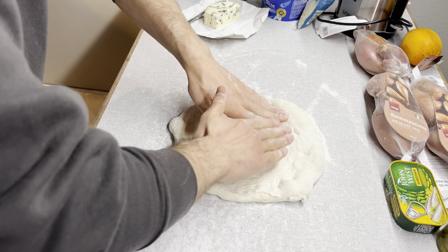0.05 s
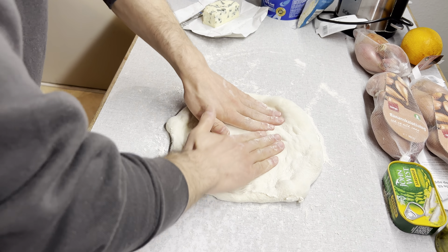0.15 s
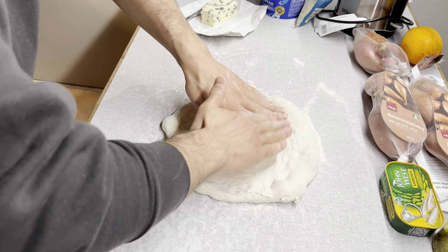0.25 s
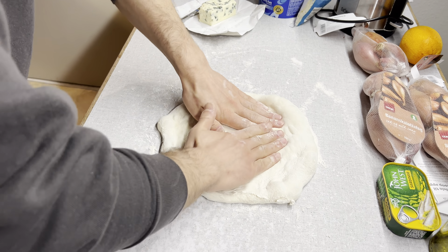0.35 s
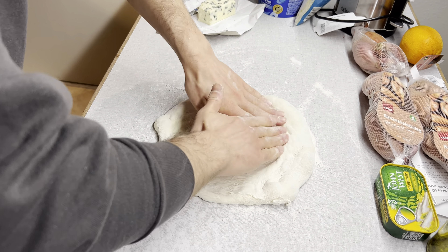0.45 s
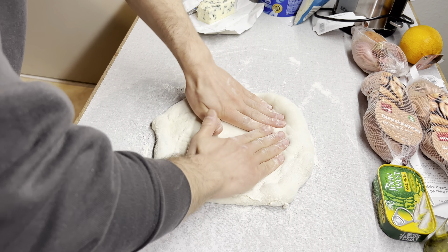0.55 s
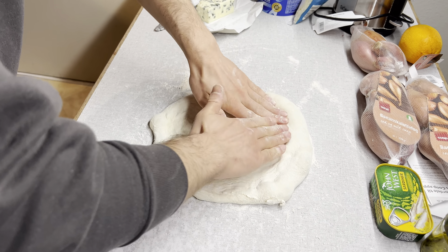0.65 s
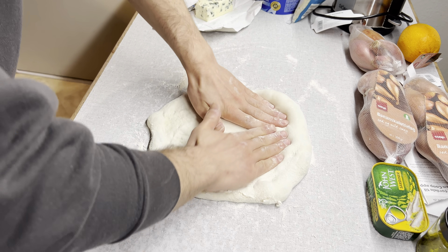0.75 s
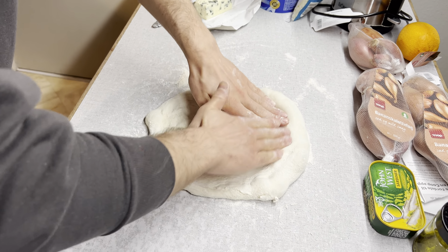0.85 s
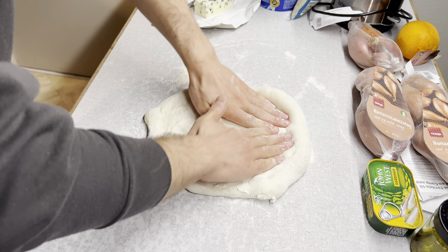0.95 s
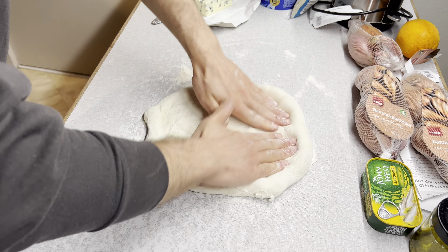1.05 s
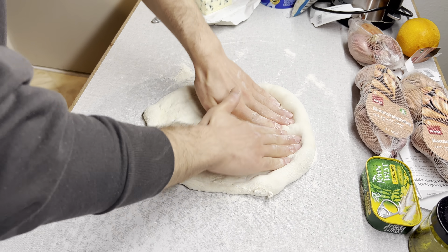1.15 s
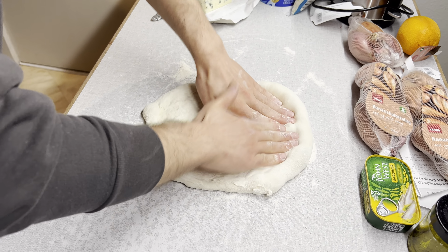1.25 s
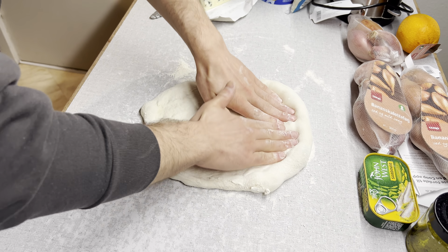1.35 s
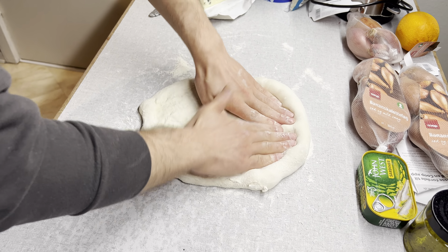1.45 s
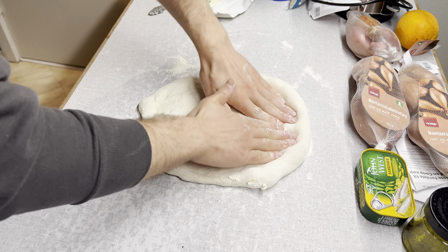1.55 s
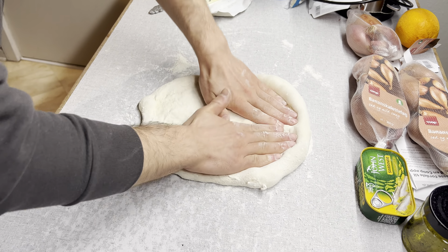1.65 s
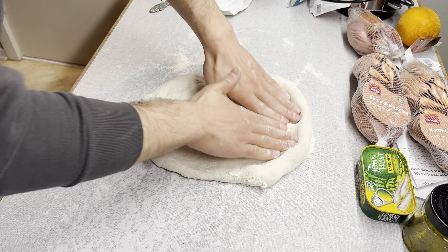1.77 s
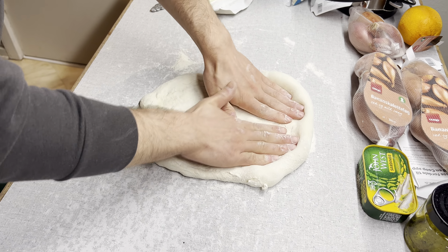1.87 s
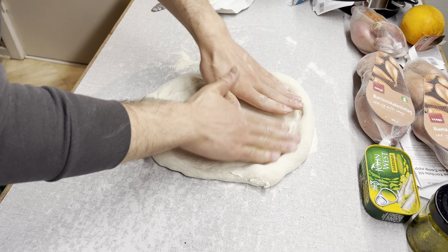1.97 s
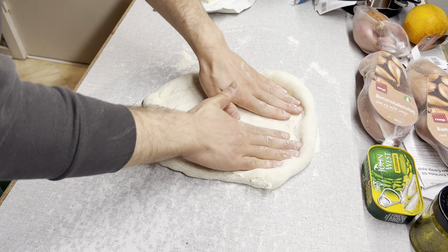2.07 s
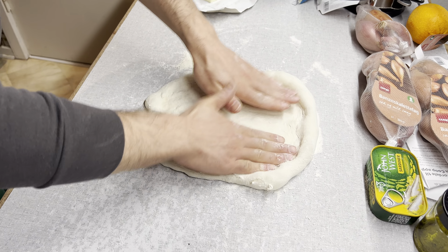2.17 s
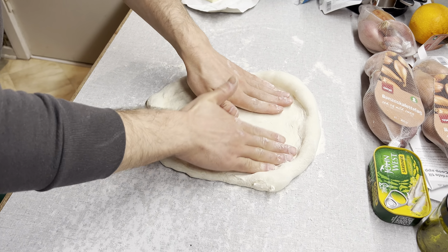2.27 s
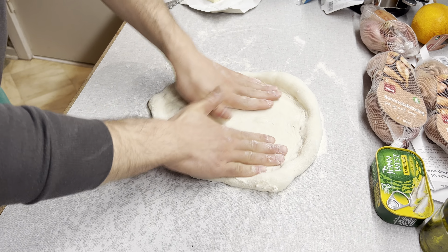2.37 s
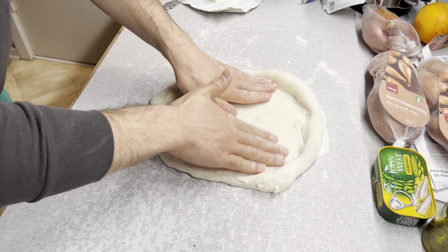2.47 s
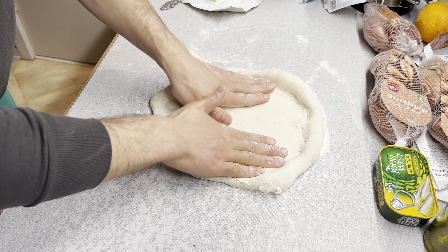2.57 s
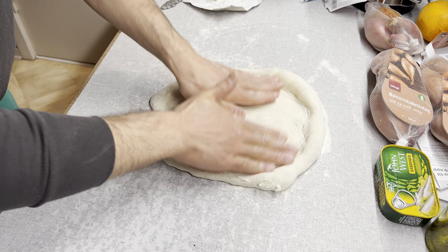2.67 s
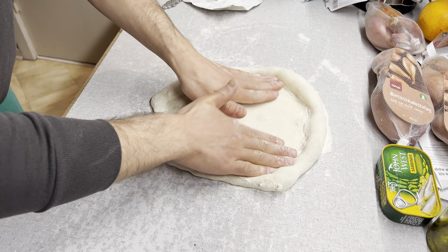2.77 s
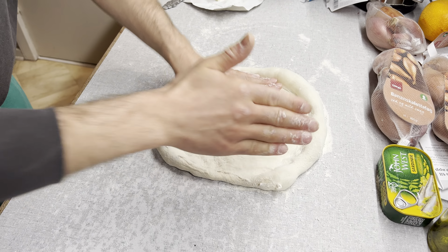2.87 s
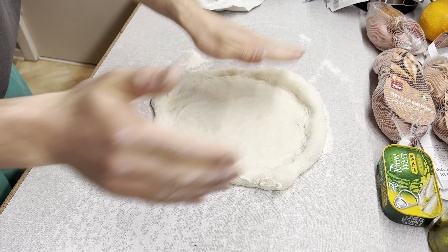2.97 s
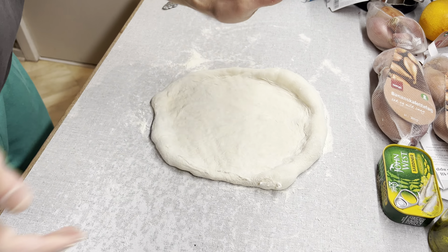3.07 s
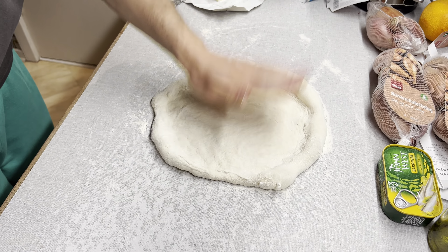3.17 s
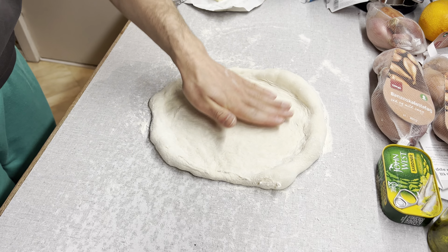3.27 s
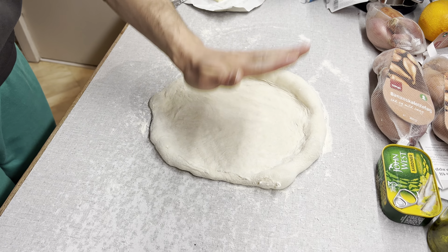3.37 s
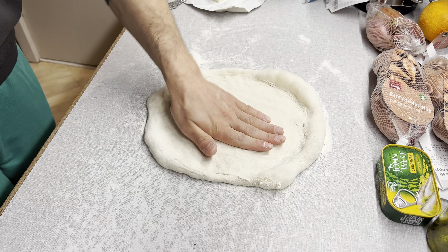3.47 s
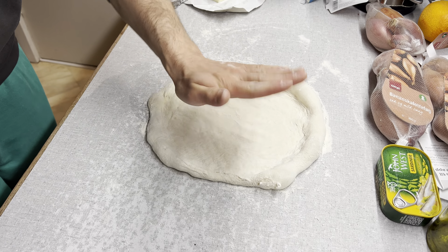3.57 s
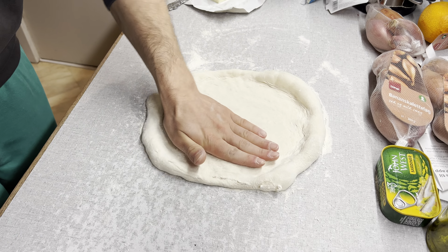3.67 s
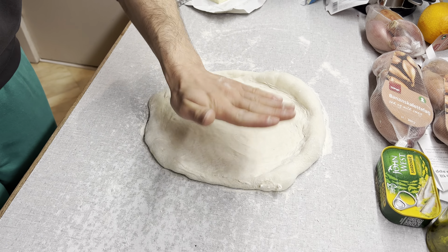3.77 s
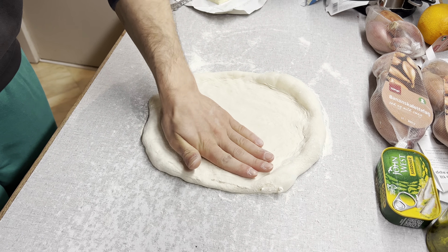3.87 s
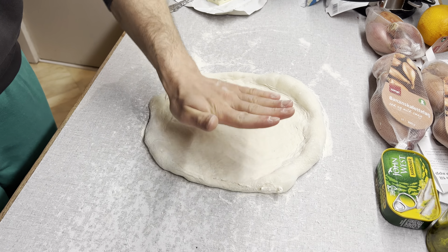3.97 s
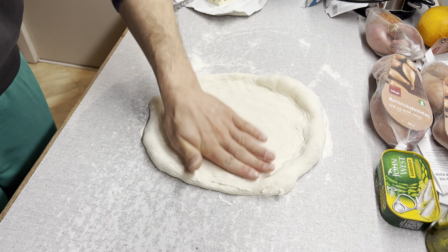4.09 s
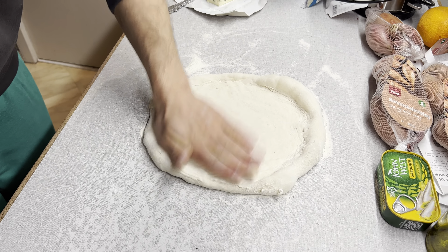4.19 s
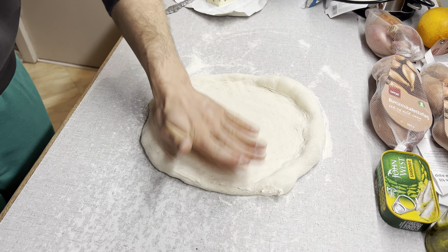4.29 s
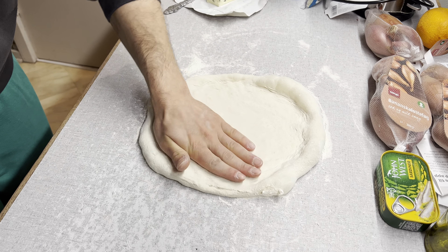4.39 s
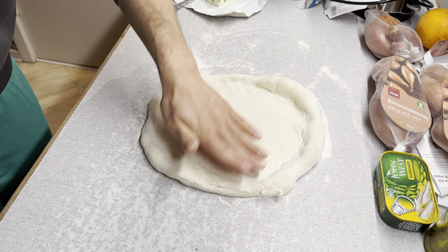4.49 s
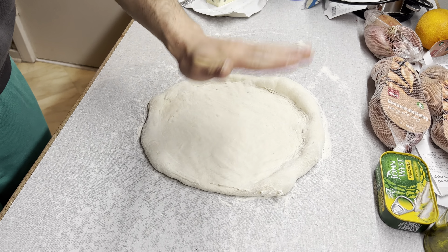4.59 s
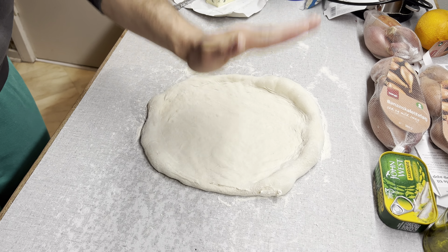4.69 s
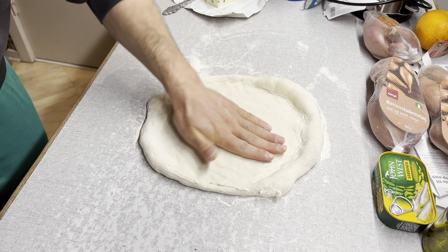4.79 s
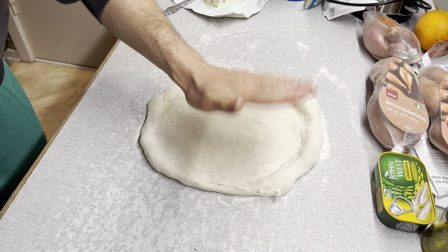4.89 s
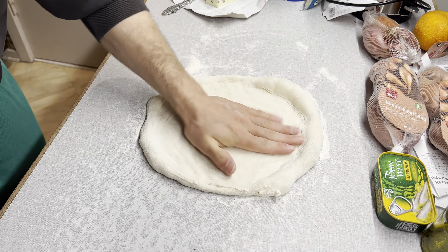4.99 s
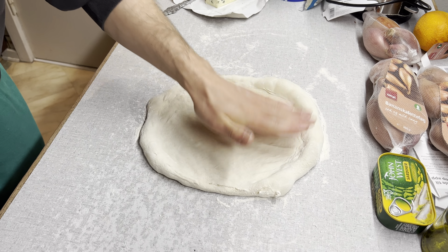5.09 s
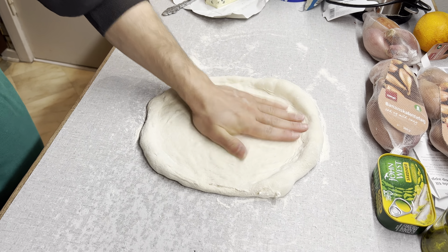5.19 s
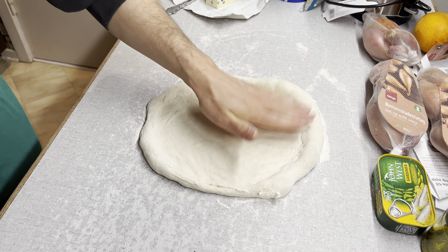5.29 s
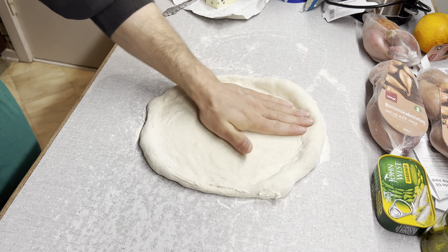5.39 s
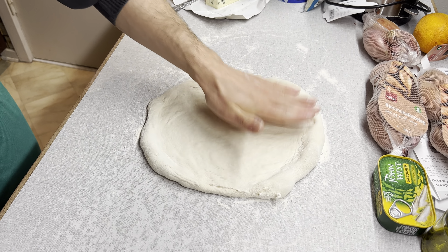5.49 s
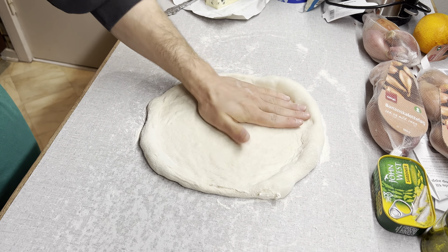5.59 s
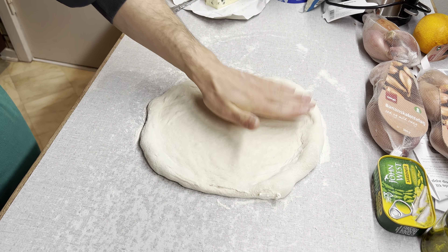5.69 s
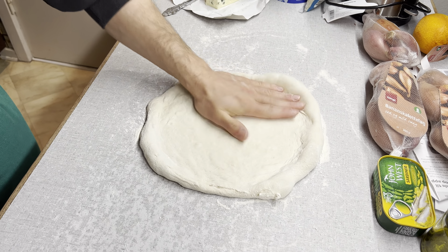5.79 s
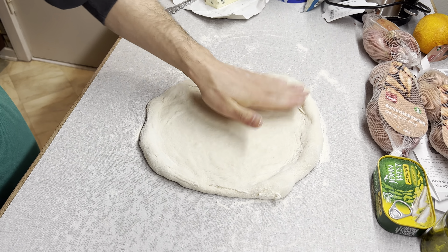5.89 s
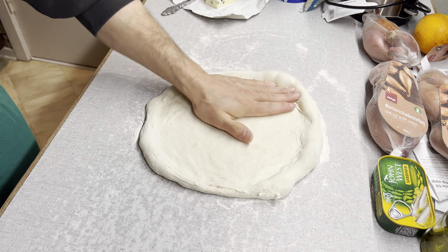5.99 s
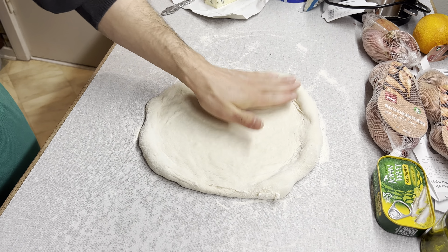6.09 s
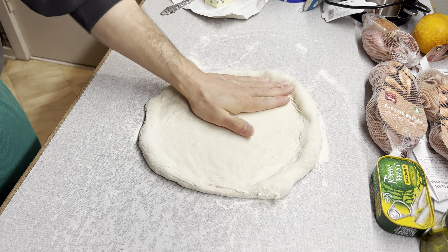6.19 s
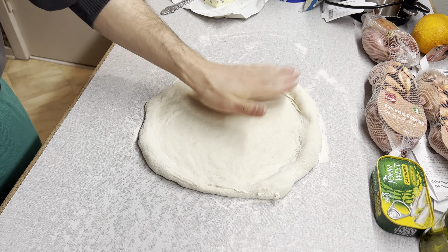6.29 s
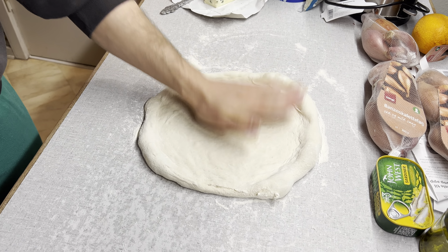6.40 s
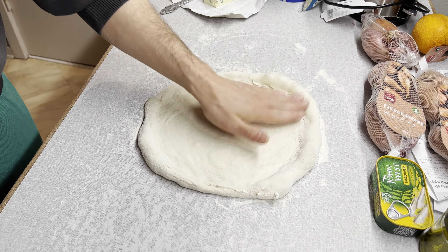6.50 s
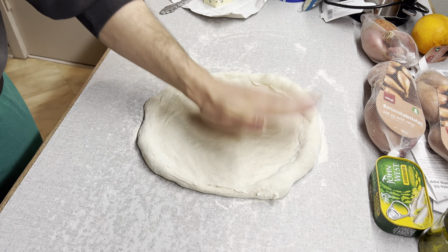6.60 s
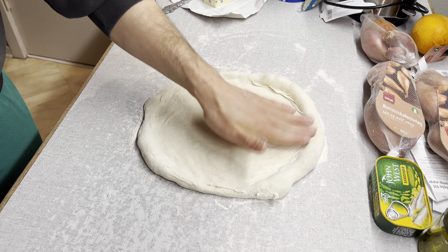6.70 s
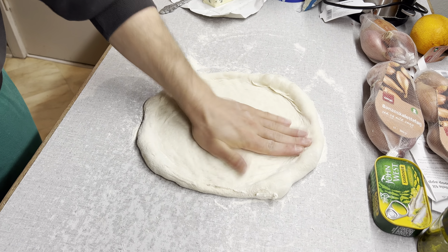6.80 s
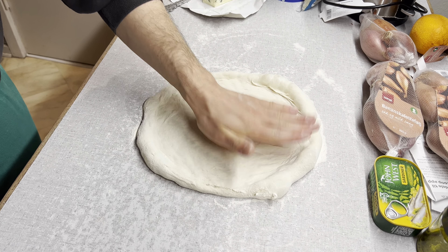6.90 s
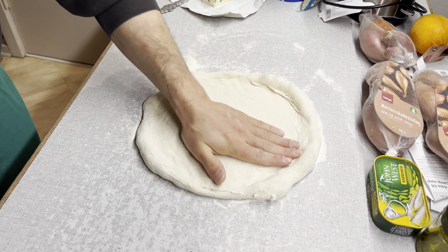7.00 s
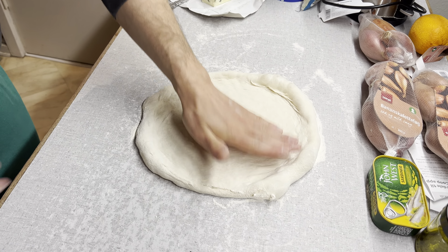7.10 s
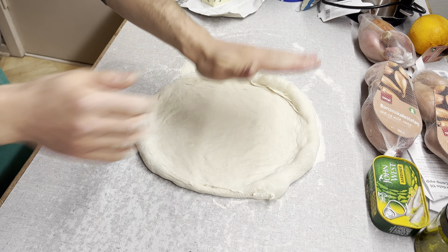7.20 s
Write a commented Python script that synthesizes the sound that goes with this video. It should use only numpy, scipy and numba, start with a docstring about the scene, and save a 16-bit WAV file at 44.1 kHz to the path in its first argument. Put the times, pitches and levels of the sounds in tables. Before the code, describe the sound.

Soft dull pats on dough over a steady appliance whir, then loud open-hand slaps in quick runs on a hard kitchen worktop.

```python
"""In a small, hard kitchen, two floury hands press and pat a round of dough on a worktop.
Then one open hand slaps it flat in two quick runs, while an appliance whirs steadily.
Each blow is shaped noise (air, skin and damp dough) plus ringing tones (worktop and cupboard).
The room answers with a wash of noise; the phone's gain control turns down once the loud slaps begin."""
import sys
import numpy as np
from scipy import signal
from scipy.fft import rfft, irfft, next_fast_len
from scipy.io import wavfile
from scipy.ndimage import uniform_filter1d
from numba import njit

SR = 44100
rng = np.random.default_rng(int(sys.argv[2]) if len(sys.argv) > 2 else 0)


def file_out(sig):
    """Save sig as 16-bit WAV at sys.argv[1]."""
    # one column per channel
    cols = np.atleast_2d(sig).T
    # limit, then scale
    lim = np.clip(cols, -1, 1)
    pcm = np.round(lim * 32767).astype(np.int16)
    wavfile.write(sys.argv[1], SR, pcm)


N = 319725  # length of the scene in samples

# All levels below are relative, before the phone changes them.
# The appliance's rush of air: (frequency [Hz], density [dB per Hz])
WHIR_SPECTRUM = [(18, -49), (30, -5), (48, -9), (102, -5.5), (171, -2.5), (337, -3), (472, -9), (552, -6.5),
                 (978, -11.5), (1340, -14), (1830, -17), (6360, -25), (10700, -31.5), (11900, -37.5),
                 (15000, -41)]
# The appliance's hum: (frequency [Hz], width [Hz], level [dB])
HUM_BANDS = [(94.7, 8.4, -43.5), (650, 50, -54.5), (1035, 60, -58), (1394, 35, -51.5), (1700, 43, -52.5)]
# Kitchen reverberation: (frequency [Hz], time to fade by 60 dB [s], level against the direct sound [dB])
KITCHEN_ECHO = [(59.6, 0.11, 1), (147, 0.43, -12), (380, 0.42, -2), (815, 0.45, 0.5), (1385, 0.35, -1.5),
                (2200, 0.35, -8.5), (6600, 0.43, -7.5), (14200, 0.25, -20)]
# Worktop, cupboard and the air around them: (frequency [Hz], level [dB], time to fade by 60 dB [s])
WORKTOP_MODES = [(57.6, -2, 0.23), (76.7, 7.5, 0.04), (107, -36, 0.039), (133.26, 4, 0.27),
                 (134.17, 11, 0.16), (201.2, 5, 0.13), (238, -4, 0.2), (256.4, 1.5, 0.15),
                 (317.8, 7, 0.059), (321, -8, 0.24), (358.3, -11, 0.47), (436.4, -6, 0.13)]
# Soft pats with the hands kept on the dough: (time [s], weight [dB], skin tick [dB])
PAT_EVENTS = [(0.1013, -32, -38.5), (0.315, -33.5, -43), (0.3761, -38.5, -46), (0.6993, -38, -46),
              (.893, -37, -48), (1.066, -35.5, -42.5), (1.2614, -36, -43.5), (1.459, -35.5, -36),
              (1.646, -34.5, -49), (2.0093, -30, -32), (2.202, -31, -36.5), (2.368, -28, -32),
              (2.5315, -35.5, -44), (2.6961, -28.5, -41.5)]
# A soft touch of floury skin: (frequency [Hz], density [dB per Hz])
TICK_SPECTRUM = [(500, -1.5), (1500, 2.5), (3000, -7.5), (5500, -0.5), (9000, -11), (13000, -14),
                 (16000, -29)]
# Open-hand slaps: (time [s], weight [dB], crack [dB], air pocket [Hz], time the hand takes to close [ms])
SLAP_EVENTS = [(3.2068, -13.5, -11.5, 3400, 1.3), (3.4309, -4, -4, 3020, 2.2),
               (3.6412, -5, -1.5, 2500, 0.63), (3.8405, -11.5, -5.5, 2090, 8.6),
               (4.0263, -6.5, -5.5, 5600, 2), (4.2124, -6, -9, 3600, 5.6), (4.3614, -6, -10.5, 1880, 1),
               (4.7634, -10, -9.5, 1760, 1.9), (4.992, -3.5, -3, 2200, 2.5),
               (5.2036, -5.5, -10.5, 2870, 0.92), (5.3863, -10.5, -13, 3190, 4.9),
               (5.5887, -13.5, -9.5, 3800, 3.8), (5.7952, -9.5, -7.5, 1690, 2.6),
               (5.984, -8, -8, 2200, 2.9), (6.1746, -11, -12, 3100, 2.4), (6.4328, -5.5, -6.5, 3250, 1.7),
               (6.6362, -23, -18.5, 4340, 3.8), (6.812, -16.5, -17, 4170, 5.7),
               (7.0001, -8.5, -6, 3920, 4.8)]
# The palm closing on dough, before the dough dampens it: (frequency [Hz], density [dB per Hz])
SMACK_SPECTRUM = [(150, -36), (380, -12), (650, -1), (900, -7), (1500, -8.5), (2300, -10), (4000, -21)]
# Skin meeting dough, before any treble or pocket lift: (frequency [Hz], density [dB per Hz])
CRACK_SPECTRUM = [(500, -4), (1300, -4.5), (2200, 7.5), (3200, -3), (4500, -0.5), (6500, -4.5),
                  (8800, -11.5), (12500, -21), (14500, -17), (16000, -37)]
# Microphone colour: (frequency [Hz], gain [dB])
MICROPHONE_COLOUR = [(7000, 0), (7700, -6), (8400, 0), (9600, -2), (10800, -14), (12000, 0), (14500, -1),
                     (16000, -9)]
# Extra shade on the right port: (frequency [Hz], gain [dB])
RIGHT_PORT_COLOUR = [(150, 0), (330, 2), (700, -1), (2400, .5), (3500, -2), (5200, -10), (8200, -6),
                     (12500, 0)]

TOP_HZ = 15900  # the phone keeps nothing much above this
RING = np.arange(int(.6 * SR)) / SR  # time axis of one ringing sound [s]
# A heavier blow squashes the dough sooner: push length at 0 dB, and the extra weight that halves it
SLAP_PUSH_MS, PAT_PUSH_MS, PUSH_HALVING_DB = 0.85, .75, 12.5
# The damp smack grows with the weight: level at 0 dB, and dB per dB of weight
SLAP_SMACK_DB, SLAP_SMACK_GROWTH = -6.5, 0.93
PAT_SMACK_DB, PAT_SMACK_GROWTH = -7, 1.235
# A hand that closes faster cracks brighter and seals its air pocket better:
# lift at 1 ms, and loss per doubling of the closing time
TREBLE_DB, TREBLE_LOSS_DB = 9, 0.66
POCKET_DB, POCKET_LOSS_DB = 11.5, 1.5


def undb(db):
    """Turn decibels into a plain factor."""
    return 10 ** (np.asarray(db) / 20)


def unit(x, seconds):
    """Scale x so that its energy, spread over the given time, has rms 1."""
    energy = np.sum(x ** 2, axis=-1, keepdims=True)
    return x / np.sqrt(energy / (seconds * SR))


def read(points, hz, axis=1):
    """Read one column of a table at the given frequencies, on a log axis."""
    points = np.array(points, float)
    return np.interp(np.log(np.maximum(hz, 1)), np.log(points[:, 0]), points[:, axis])


def colour(x, points):
    """Filter x with a spectrum of (frequency [Hz], level [dB]) points."""
    size = next_fast_len(x.shape[-1] + 2048)
    gain = undb(read(points, np.fft.rfftfreq(size, 1 / SR)))
    return irfft(rfft(x, size) * gain, size)[..., :x.shape[-1]]


def resonance(x, hz, width_hz):
    """Let through a narrow band, with gain 1 at its centre (two poles)."""
    return signal.lfilter(*signal.iirpeak(hz, hz / width_hz, SR), x)


def add(track, s, sound):
    """Mix a sound into a track from time s on."""
    start = int(s * SR)
    part = sound[:max(N - start, 0)]
    track[start:start + len(part)] += part


def diffuse(size, alike_hz=330):
    """Make spectra of noise arriving from all round: long waves are alike at both ports."""
    noise = rfft(rng.standard_normal((3, size)))
    alike = 1 / (1 + (np.fft.rfftfreq(size, 1 / SR) / alike_hz) ** 2)
    return np.sqrt(alike) * noise[0] + np.sqrt(1 - alike) * noise[1:]


def appliance(whir_db=-39):
    """Steady air noise, with a few blurred hums made from narrow bands of noise."""
    air = irfft(diffuse(N), N)
    flutter = irfft(diffuse(N), N)
    hum = 0
    for hz, width_hz, db in HUM_BANDS:
        hum = hum + undb(db) * unit(resonance(flutter, hz, width_hz), N / SR)
    return undb(whir_db) * unit(colour(air, WHIR_SPECTRUM), N / SR) + hum


def kitchen(x):
    """Echoes too dense to tell apart: each band stores the sound's energy and lets it go as an even wash."""
    size = next_fast_len(N + SR // 10, real=True)
    hz = np.fft.rfftfreq(size, 1 / SR)
    source, noise, wash = rfft(x, size), diffuse(size), 0
    # the nearest walls answer after a few milliseconds
    build = 1 - np.exp(-(RING / .004) ** 2)
    for centre in 62.5 * 2 ** np.arange(0, 8.1, 2 / 3):  # bands two thirds of an octave apart
        band = np.maximum(1 - abs(np.log2((hz + 1) / centre)) * 3 / 2, 0)
        decay = np.exp(-np.log(1000) * RING / read(KITCHEN_ECHO, centre))
        fade = (build * decay) ** 2  # squared, because it acts on energy
        energy = irfft(source * np.sqrt(band), size)[:N] ** 2
        stored = signal.fftconvolve(energy, fade / fade.sum())[:N]
        carrier = unit(irfft(noise * band, size)[:, :N], N / SR)
        level = undb(read(KITCHEN_ECHO, centre, axis=2))
        wash = wash + level * np.sqrt(abs(stored)) * carrier
    return wash


def flour(rub_db=-61, delay_s=0.031, spread_s=0.036, grain_db=4, low_hz=3500):
    """After each pat the hands slide a little, and flour grains rustle under them."""
    t = np.arange(N) / SR
    slide = sum(np.exp(-((t - row[0] - delay_s) / spread_s) ** 2) for row in PAT_EVENTS)
    present = rng.random(N) < .03  # a grain in about 3 samples of 100
    size = undb(grain_db * np.minimum(rng.exponential(size=N), 4))
    grains = rng.standard_normal(N) * present * size
    high_pass = signal.butter(1, low_hz, "high", fs=SR, output="sos")
    rustle = signal.sosfilt(high_pass, grains)
    return undb(rub_db) * slide * unit(rustle, N / SR)


def push_length(shortest_ms, weight_db):
    """How long the dough takes to stop the hand, in ms: lighter blows sink in more slowly."""
    return shortest_ms * 2 ** (-weight_db / PUSH_HALVING_DB)


def thump(push_ms, scatter_db=1.01):
    """The dough spreads the blow into a smooth push; where the hand lands sets each mode's share."""
    hz, db, t60 = np.transpose(WORKTOP_MODES)[..., None]
    share = undb(db + scatter_db * rng.standard_normal(hz.shape))
    side = -(-1) ** np.arange(len(hz))[:, None]  # neighbouring modes swing in opposite directions
    decay = np.exp(-np.log(1000) * RING / t60)
    ring = np.sum(side * share * decay * np.sin(2 * np.pi * hz * RING), axis=0)
    # the push is half a sine wave, at least half a millisecond long
    push = np.sin(np.pi * np.minimum(RING * 1000 / max(push_ms, .5), 1))
    sound = signal.fftconvolve(ring, push)[:len(RING)]
    return sound / np.std(sound[:SR // 20])


def burst(peak_s, rise_s, fall_s):
    """Noise that swells up to peak_s and dies away."""
    t = RING[:SR // 10] - peak_s
    return rng.standard_normal(len(t)) * np.exp(np.minimum(t / rise_s, -t / fall_s))


def damp(x):
    """Soft dough swallows the top of a smack."""
    return signal.sosfilt(signal.butter(2, 4500, fs=SR, output="sos"), x)


def pats(tick_db=1, tick_fall_s=0.0021):
    """A slow push gives a round thud, with only a faint tick of skin on flour."""
    body, skin = np.zeros(N), np.zeros(N)
    lead = 1 / 40  # room for the noise to swell before the blow [s]
    for s, weight_db, touch_db in PAT_EVENTS:
        smack_db = PAT_SMACK_DB + PAT_SMACK_GROWTH * weight_db
        tick = colour(burst(lead + 0.0037, 0.0029, tick_fall_s), TICK_SPECTRUM)
        smack = damp(colour(burst(lead + 0.0017, 0.0017, 0.008), SMACK_SPECTRUM))
        add(skin, s - lead, undb(touch_db + tick_db) * unit(tick, 1 / 80))
        add(body, s - lead, undb(smack_db) * unit(smack, 1 / 25))
        add(body, s, undb(weight_db) * thump(push_length(PAT_PUSH_MS, weight_db)))
    return body, skin


def slaps(smack_fall_s=0.0036, crack_db=1, air_db=-19, pocket_q=17.0, rise_share=0.43, fall_share=0.85):
    """Air rushes from under the falling palm, a closing air pocket cracks at its own pitch, and the weight follows."""
    body, skin = np.zeros(N), np.zeros(N)
    lead = 1 / 40  # room for the noise to swell before the blow [s]
    for s, weight_db, snap_db, pocket_hz, close_ms in SLAP_EVENTS:
        close_s = close_ms / 1000
        treble_db = TREBLE_DB - TREBLE_LOSS_DB * np.log2(close_ms)
        pocket_db = POCKET_DB - POCKET_LOSS_DB * np.log2(close_ms)
        smack_db = SLAP_SMACK_DB + SLAP_SMACK_GROWTH * weight_db
        air = colour(burst(lead, .005, .0005), CRACK_SPECTRUM)
        crack = burst(lead + 0.19 * close_s, rise_share * close_s, fall_share * close_s)
        crack = colour(crack, CRACK_SPECTRUM)
        crack = colour(crack, [(4500, 0), (10000, treble_db)])
        # lift a narrow band at the pocket's pitch
        pocket = resonance(crack, pocket_hz, pocket_hz / pocket_q)
        crack = crack + (undb(pocket_db) - 1) * pocket
        smack = damp(colour(burst(lead + 0.0021, 0.00078, smack_fall_s), SMACK_SPECTRUM))
        snap = undb(crack_db) * unit(crack, 1 / 80) + undb(air_db) * unit(air, 1 / 80)
        add(skin, s - lead, undb(snap_db) * snap)
        add(body, s - lead, undb(smack_db) * unit(smack, 1 / 25))
        add(body, s, undb(weight_db) * thump(push_length(SLAP_PUSH_MS, weight_db)))
    return body, skin


def scene(echo_db=-19):
    """Add up the hands, one ceiling echo, the kitchen's wash and the appliance, at two ports."""
    body, skin = np.add(slaps(), pats())
    hands = body + skin + flour()
    # the hands are nearer the left port, so the right one hears them a quarter of a millisecond later
    direct = np.array([hands, np.roll(hands, 11)])
    # the ceiling throws each skin sound back once before the echoes merge
    ceiling = undb(echo_db) * np.roll(skin, SR // 80)
    return direct + ceiling + kitchen(hands) + appliance()


@njit
def hold(level, release):
    """Follow a level up at once and let it sink slowly."""
    out, held = np.empty(len(level)), 0.
    for i in range(len(level)):
        held = max(level[i], held * release)
        out[i] = held
    return out


def record(dry, threshold_db=-19, ratio=1.917, release_s=29.0):
    """The phone colours the sound, turns its gain down fast and up slowly, rounds the peaks and cuts the top."""
    sound = colour(dry, MICROPHONE_COLOUR)
    sound = np.array([sound[0], colour(sound[1], RIGHT_PORT_COLOUR)])
    power = uniform_filter1d(np.mean(sound ** 2, axis=0), size=SR // 60)
    loudness = hold(np.sqrt(abs(power)), np.exp(-1 / (release_s * SR)))
    excess = np.maximum(loudness / undb(threshold_db), 1)
    sound = sound * excess ** (1 / ratio - 1)
    sound = sound / (1 + sound ** 6) ** (1 / 6)  # round the peaks
    low_pass = signal.ellip(8, .2, 70, TOP_HZ, fs=SR, output="sos")
    return signal.sosfilt(low_pass, sound)


dry = scene()
out = record(dry)
file_out(out)
```